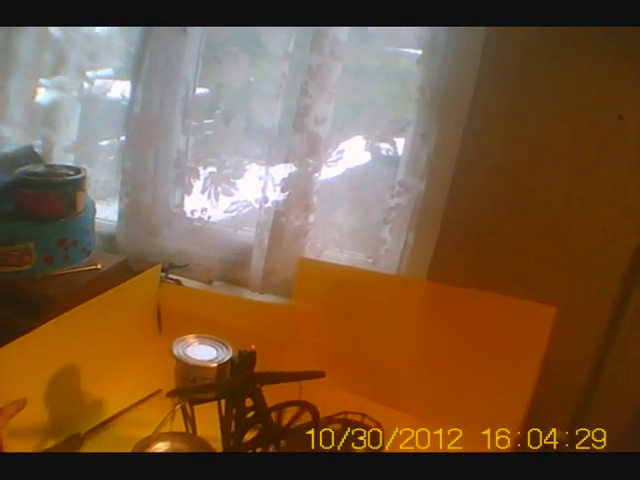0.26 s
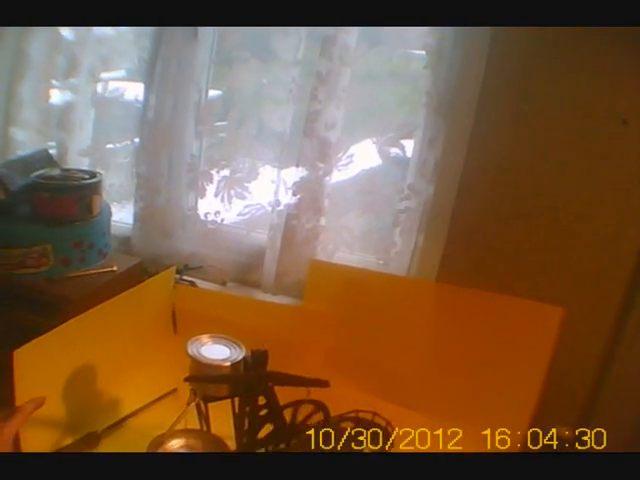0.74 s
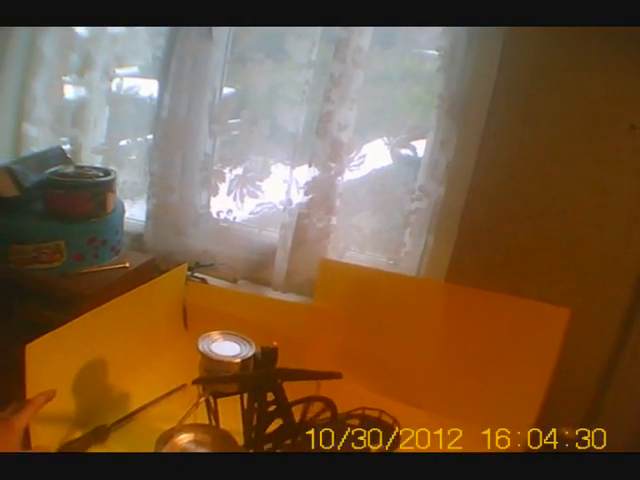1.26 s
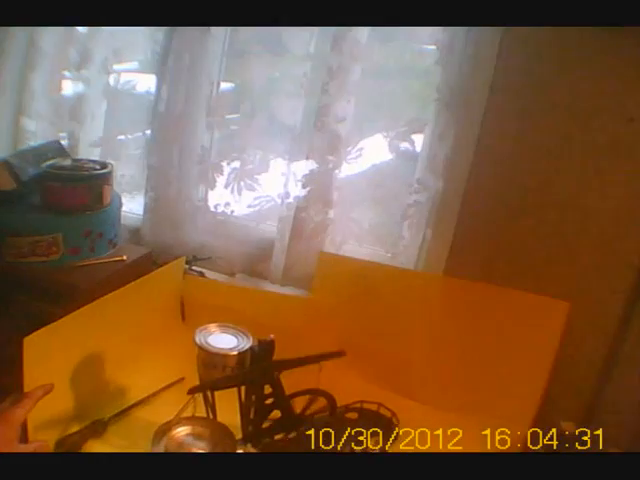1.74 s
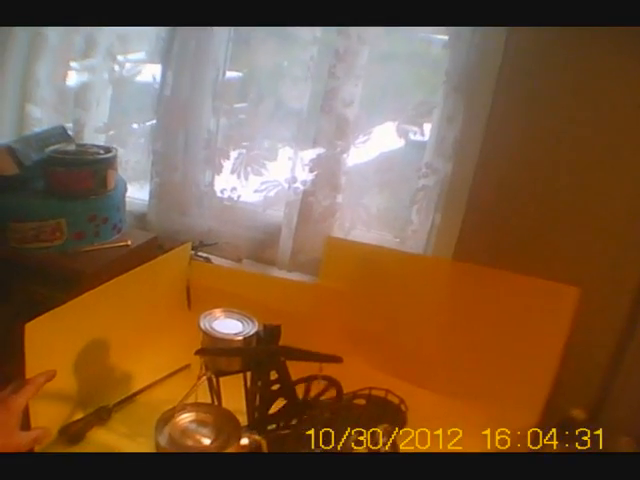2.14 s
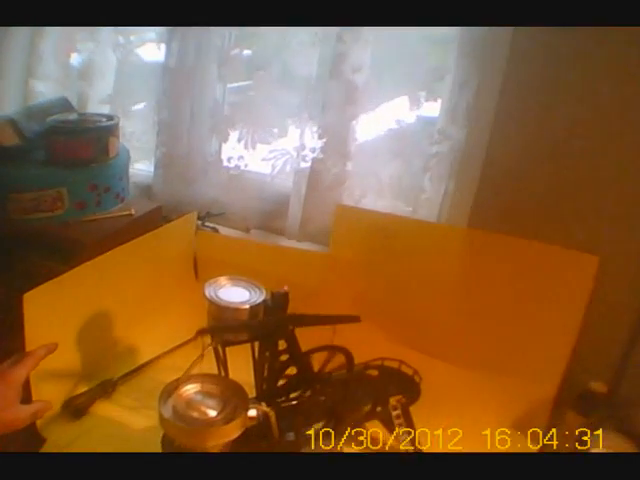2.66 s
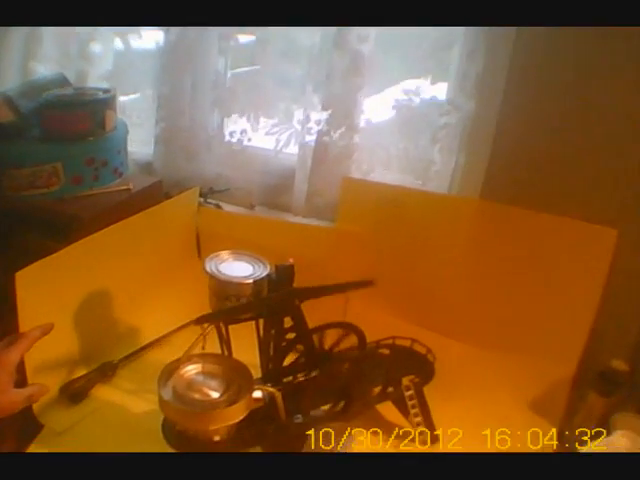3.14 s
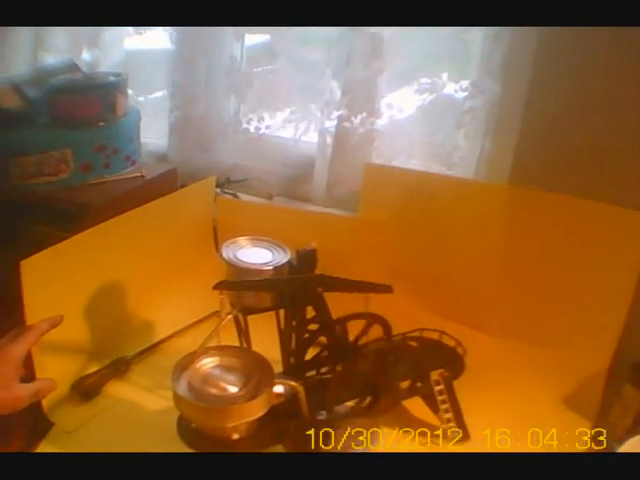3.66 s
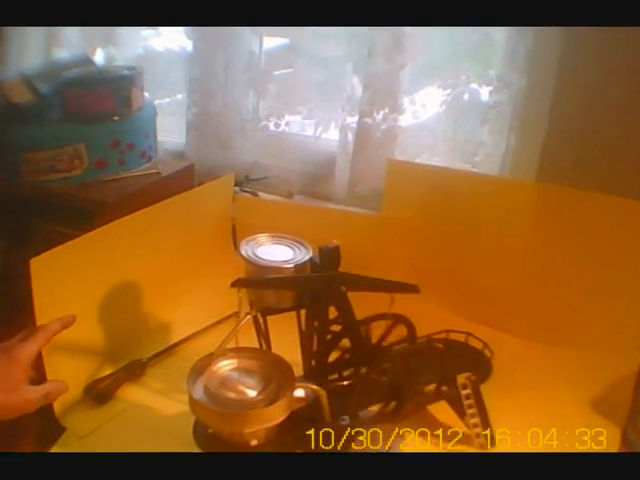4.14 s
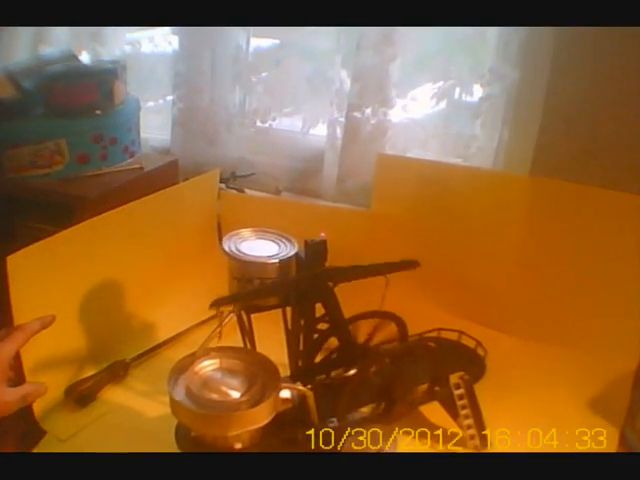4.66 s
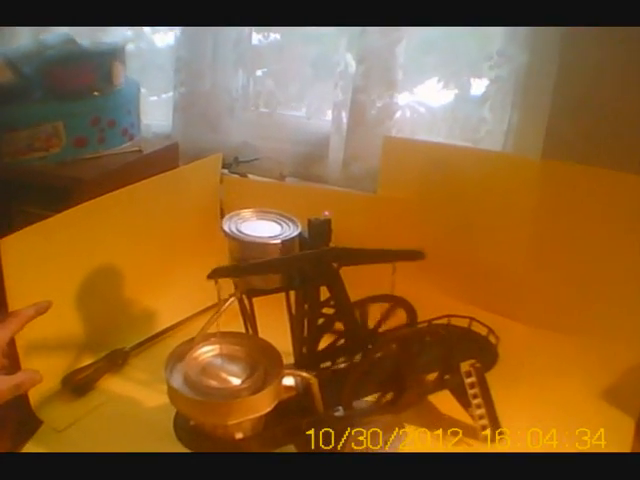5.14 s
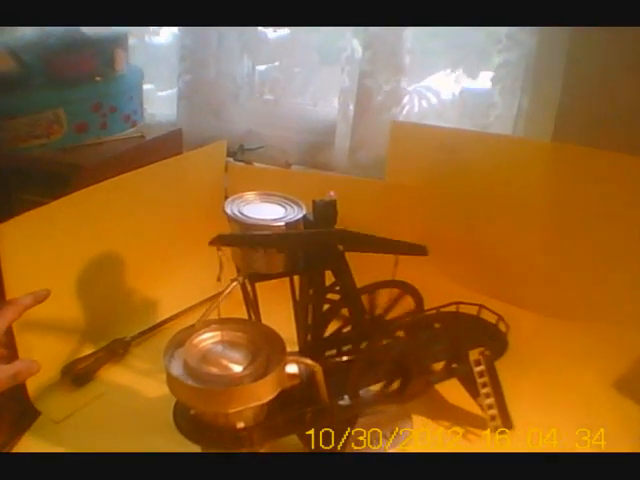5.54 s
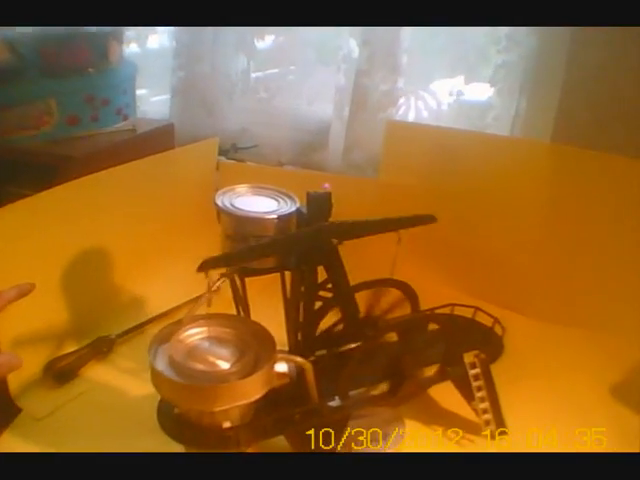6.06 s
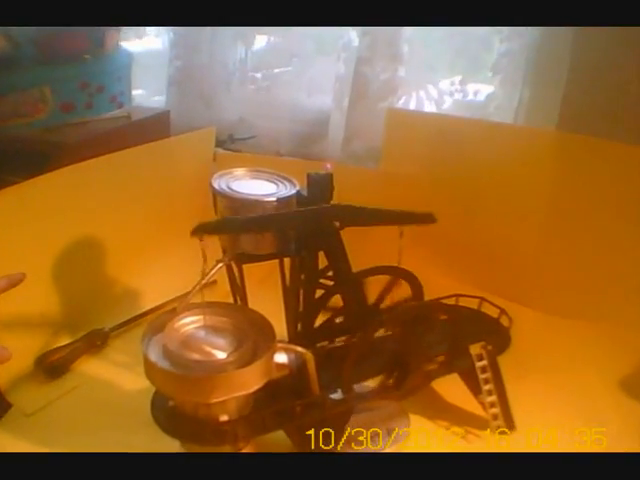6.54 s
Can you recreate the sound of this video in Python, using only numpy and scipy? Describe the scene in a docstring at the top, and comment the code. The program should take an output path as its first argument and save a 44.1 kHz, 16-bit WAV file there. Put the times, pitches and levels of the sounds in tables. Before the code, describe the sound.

Steady, sharp metallic ticks and softer clunks come from a little hot-air engine turning slowly indoors, over faint hiss.

```python
"""A small homemade hot-air beam engine turns about 86 times a minute on a table in a quiet room.
From the start there is camera hiss and rumble, a lightly rubbing pivot and a low hum that soon dies away.
Each turn opens with the rod's soft clunk; the diaphragm thumps, pivot and piston scrape faintly,
and one sharp knock rings the tin and frame. Now and then the linkage creaks.
Throughout, the room's reflections slowly shift as the microphone drifts."""
import sys
import numpy as np
from scipy import signal
from scipy.fft import rfft, irfft
from scipy.io import wavfile

SR = 44100
rng = np.random.default_rng(int(sys.argv[2]) if len(sys.argv) > 2 else 0)


def log_audio(samples):
    """Write samples as a 16-bit WAV file to the path given in sys.argv[1]."""
    # one column per channel
    frames = np.atleast_2d(samples).T
    # limit to full scale, then quantise
    limited = np.clip(frames, -1, 1)
    pcm = np.round(limited * 32767).astype(np.int16)
    wavfile.write(sys.argv[1], SR, pcm)


N = 300321
TIME = np.arange(N) / SR


def undb(db):
    """Decibels to gain."""
    return 10 ** (np.asarray(db) / 20)


def unit(x):
    """Scale to rms 1."""
    return x / np.sqrt(np.mean(x ** 2))


def add(track, s, sound):
    """Mix a sound into the track at s seconds."""
    start = max(int(s * SR), 0)
    part = sound[:max(N - start, 0)]
    track[start:start + len(part)] += part


def grit(decay_s):
    """A short spray of tiny contacts with unit energy."""
    t = np.arange(6000) / SR
    spray = rng.standard_normal(len(t)) * t * np.exp(-t / decay_s)
    return spray / np.linalg.norm(spray)


def contacts(hits, rough, decay_s, tap_hz):
    """Force of each hit: a cushioned tap, then a spray of grit as the parts settle."""
    cushion = signal.butter(1, tap_hz, fs=SR, output="sos")
    tap = signal.sosfilt(cushion, signal.unit_impulse(512))
    force = np.zeros(N)
    for s, db in hits:
        add(force, s, undb(db) * tap)
        add(force, s, undb(db) * rough * grit(decay_s))
    return force


def ring(force, modes):
    """A force rings a body's damped modes; neighbours swing in opposite senses."""
    t = np.arange(16000) / SR
    response = sum((-1) ** k * undb(db - 60 * t / t60) * np.sin(2 * np.pi * hz * t)
                   for k, (hz, db, t60) in enumerate(modes))
    return signal.fftconvolve(force, response)[:N]


def friction(resonances):
    """Uneven tiny slips heard through a set of resonances, at rms 1."""
    grain_db = 3 * rng.exponential(size=N // 64 + 1).clip(0, 3)
    slips = rng.standard_normal(N) * undb(np.repeat(grain_db, 64)[:N])
    return unit(sum((-1) ** k * undb(db) * signal.lfilter(*signal.iirpeak(hz, hz / width, fs=SR), slips)
                    for k, (hz, width, db) in enumerate(resonances)))


# noise bed of room rumble and microphone hiss: (frequency [Hz], relative density [dB])
BED_SPECTRUM = [(8, -12.5), (15, -2), (28, -1), (48, -4.5), (70, -11.5), (110, -14.5), (200, -19),
                (330, -25), (850, -31), (1400, -33.5), (2000, -38.5), (3000, -41), (6000, -42.5),
                (8000, -43), (10500, -44)]
# thin camera whine: (frequency [Hz], rms level [dB])
WHINE_TONES = [(3893, -79), (9600, -84)]


def background():
    """A steady bed of rumble and hiss with a trace of electronic whine."""
    bed_hz, bed_db = np.transpose(BED_SPECTRUM)
    bins_hz = np.maximum(np.fft.rfftfreq(N, 1 / SR), 1)
    colour = undb(np.interp(np.log(bins_hz), np.log(bed_hz), bed_db))
    bed = irfft(rfft(rng.standard_normal(N)) * colour, N)
    whine = sum(np.sqrt(2) * undb(db) * np.sin(2 * np.pi * hz * TIME) for hz, db in WHINE_TONES)
    return undb(-40) * unit(bed) + whine


# low drone: (harmonic [number], relative level [dB])
HUM_HARMONICS = [(1, -5), (2, -7), (3, -4.5)]


def hum(pitch_hz=25.2, level_db=-35, hold_s=0.68, fade_db_per_s=27):
    """A deep hum, as of a motor elsewhere in the house, holds and then dies away."""
    tone = sum(undb(db) * np.sin(2 * np.pi * (harmonic * pitch_hz * TIME + rng.random()))
               for harmonic, db in HUM_HARMONICS)
    return unit(tone) * undb(level_db - fade_db_per_s * np.maximum(TIME - hold_s, 0))


# the engine's beat, a row per flywheel turn: (knock time [s], knock level [dB], thump level [dB])
TURN_CUES = [(0.557, -20, -44.5), (1.2557, -20.5, -46.5), (1.9544, -20.5, -46), (2.657, -20, -45.5),
             (3.367, -20, -44), (4.040, -18.3, -42.5), (4.735, -19, -44.5), (5.4358, -19.5, -44),
             (6.134, -19.5, -43.5), (6.825, -19, -46.5)]


def before_knocks(lead_s):
    """The moment in every turn that comes lead_s ahead of the knock."""
    return np.array(TURN_CUES)[:, 0] - lead_s


def swell(lead_s, half_s):
    """A smooth rise and fall at the same place in every turn."""
    return sum(np.exp(-((TIME - s) / half_s) ** 2) for s in before_knocks(lead_s))


# colour of the pivot's scrape: (frequency [Hz], width [Hz], relative level [dB])
PIVOT_BANDS = [(287, 141, 5), (670, 280, -0.5), (1176, 277, 2.5), (1684, 487, -0.5), (4820, 850, -12),
               (6650, 280, -14.5), (9060, 1100, -14)]
# scrape swell on each stroke: (lead before the knock [s], half length [s], level [dB])
PIVOT_SWELLS = [(0.079, .028, -50.5), (.31, .06, -64)]


def pivot(rub_db=-58.5):
    """A dry pivot rubs lightly all the time and scrapes on both strokes, hardest just before the knock."""
    strokes = sum(undb(db) * swell(lead_s, half_s) for lead_s, half_s, db in PIVOT_SWELLS)
    return friction(PIVOT_BANDS) * (undb(rub_db) + strokes)


# body of the clunk, rod and beam: (frequency [Hz], gain [dB], t60 [s])
ROD_MODES = [(239.8, -4, 0.18), (304, -6, 0.08), (382, -10, 0.075), (573, -18, 0.037), (1112, -3.5, 0.027),
             (1262, -12, 0.068), (1630, -7.5, 0.017), (4300, -15, 0.017)]


def rod(hit_db=-35.5):
    """On the return stroke the rod drops back into its bearing and settles with a short rattle."""
    drops = [(s, hit_db) for s in before_knocks(lead_s=.319)]
    return ring(contacts(drops, rough=0.47, decay_s=0.0041, tap_hz=5000), ROD_MODES)


# body of the diaphragm's thump: (frequency [Hz], gain [dB], t60 [s])
DIAPHRAGM_MODES = [(248, 3, 0.041), (314, 1, 0.096), (394, -0.5, 0.069), (556, -24, 0.062),
                   (733, -13, 0.063), (1563, -10, 0.11)]


def diaphragm(bulge_lead_s=.178, relax_lead_s=.076, relax_db=-51):
    """The membrane bulges in mid stroke, then relaxes more softly: two dull, slightly crinkly thumps."""
    bulges = [(s - bulge_lead_s, db) for s, _, db in TURN_CUES]
    relaxes = [(s, relax_db) for s in before_knocks(relax_lead_s)]
    force = contacts(bulges + relaxes, rough=0.87, decay_s=0.0068, tap_hz=400)
    return undb(4.5) * ring(force, DIAPHRAGM_MODES)


# stray creaks: (time [s], level [dB])
CREAK_CUES = [(.399, -45), (2.4999, -47), (4.634, -45), (5.9765, -57), (6.662, -50)]
# ring of the linkage: (frequency [Hz], gain [dB], t60 [s])
LINKAGE_MODES = [(1280, -10, .04), (1550, 0, 0.056)]


def creaks():
    """A joint of the linkage sticks and slips for a few milliseconds."""
    return ring(contacts(CREAK_CUES, rough=.8, decay_s=0.0025, tap_hz=3000), LINKAGE_MODES)


# colour of the piston's hiss: (frequency [Hz], width [Hz], relative level [dB])
PISTON_BANDS = [(4560, 380, -2), (6600, 410, 1), (8600, 610, -3)]


def piston(level_db=-58):
    """The piston slides with a short, thin hiss on each working stroke."""
    return friction(PISTON_BANDS) * undb(level_db) * swell(lead_s=0.094, half_s=.018)


# tinny ring of the cylinder and frame: (frequency [Hz], gain [dB], t60 [s])
FRAME_MODES = [(310.6, -6, 0.048), (421, -13, 0.044), (460, -25, 0.059), (528, -2, 0.024), (701, -40, 0.14),
               (1063, -8.5, 0.056), (1120, 4, 0.017), (1298, 3.5, 0.023), (1384, 3, 0.036),
               (1687, 6.5, 0.014), (1773, 3.5, 0.018), (1940, -3, 0.024), (3950, -28, 0.028),
               (4470, -21, 0.042), (6560, -32, 0.024), (8340, -39, 0.022)]
# the hit and the chatter of loose parts after it: (delay [s], relative level [dB])
KNOCK_CHATTER = [(0, 0), (.0028, -9), (.0104, -8.5), (.0173, -22), (.033, -15.5)]


def knock():
    """A sharp knock rings the tin and frame; the chatter differs a little from turn to turn."""
    hits = []
    for s, knock_db, _ in TURN_CUES:
        for delay_s, chatter_db in KNOCK_CHATTER:
            late, louder = rng.standard_normal(2)
            hits.append((s + delay_s * (1 + 0.013 * late), knock_db + chatter_db + .5 * louder))
    force = contacts(hits, rough=0.18, decay_s=0.0052, tap_hz=5030)
    return undb(-2.5) * ring(force, FRAME_MODES)


def clack(low_cut_hz=3900, boost_db=1):
    """The metal faces grind together for an instant at each knock: a dry spray of treble."""
    spray = np.zeros(N)
    for s, knock_db, _ in TURN_CUES:
        add(spray, s, undb(knock_db + boost_db) * grit(decay_s=0.0092))
    return signal.sosfilt(signal.butter(2, low_cut_hz, "high", fs=SR, output="sos"), spray)


def room(dry, t60_s=.215, build_s=.011, wet_db=-3, spots=9):
    """Dense reflections of a small room; their pattern changes as the microphone moves between spots."""
    t = np.arange(18000) / SR
    envelope = undb(-60 * t / t60_s) * (1 - np.exp(-(t / build_s) ** 2))
    tails = rng.standard_normal((spots, len(t))) * envelope
    position = np.linspace(0, spots - 1, N)
    wet = np.zeros(N)
    for spot, tail in enumerate(tails):
        crossfade = np.sqrt(np.clip(1 - abs(position - spot), 0, 1))
        wet += crossfade * signal.oaconvolve(dry, tail / np.linalg.norm(tail))[:N]
    return dry + undb(wet_db) * wet


def scene():
    """The engine in its room over the hum and the noise bed, in mono."""
    engine = knock() + clack() + rod() + diaphragm() + creaks() + pivot() + piston()
    return (room(engine) + hum() + background())[None]


def record(dry):
    """The camera rounds off the top, then cuts it steeply; its converter sits slightly below zero."""
    roll_off_hz, cut_hz, dc_offset = 10250, 10900, -.08
    rounded = signal.sosfilt(signal.butter(10, roll_off_hz, fs=SR, output="sos"), dry)
    return signal.sosfilt(signal.ellip(10, .2, 80, cut_hz, fs=SR, output="sos"), rounded) + dc_offset


dry = scene()
out = record(dry)
log_audio(out)
```